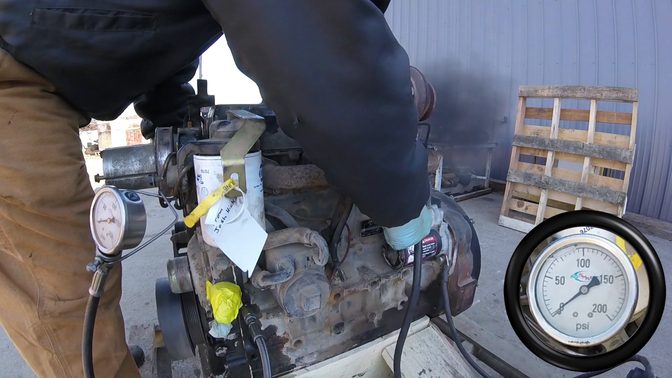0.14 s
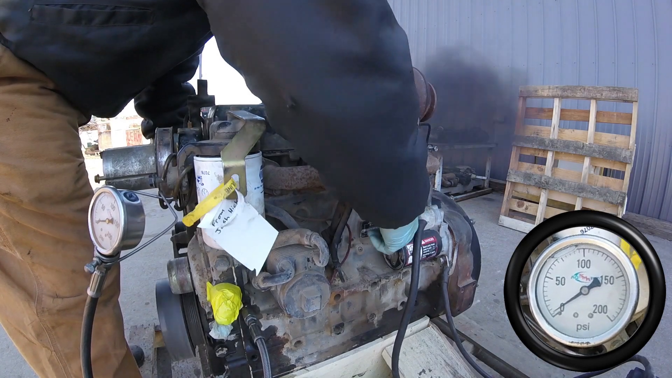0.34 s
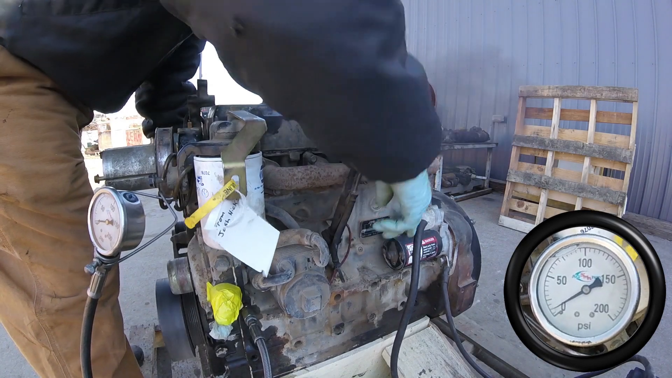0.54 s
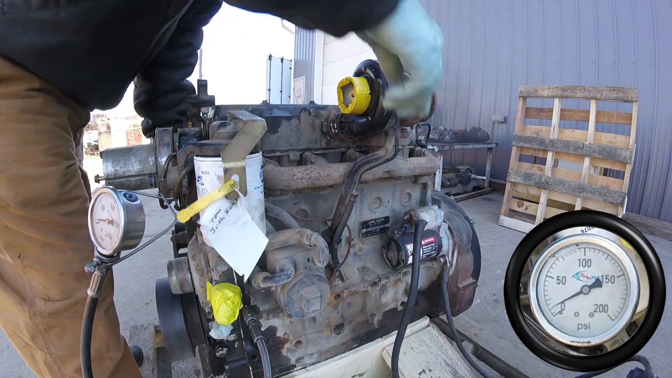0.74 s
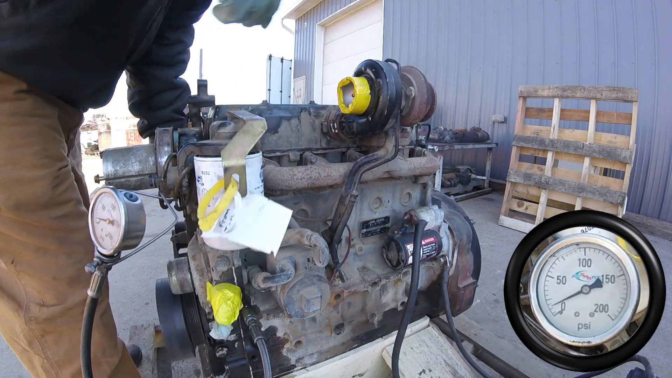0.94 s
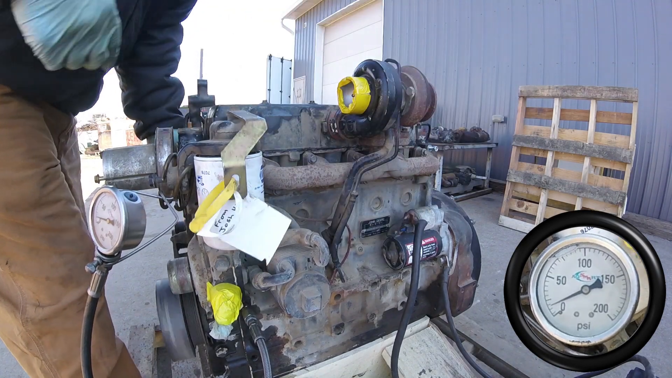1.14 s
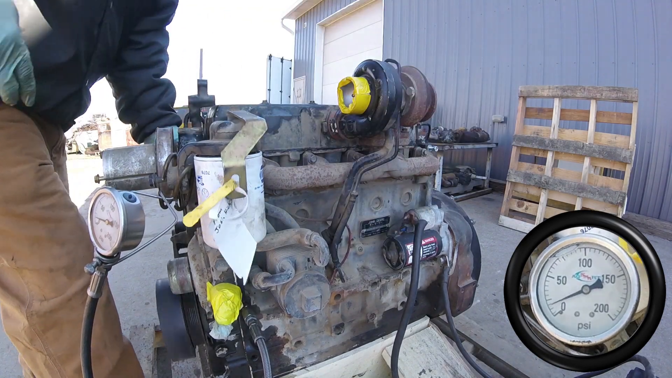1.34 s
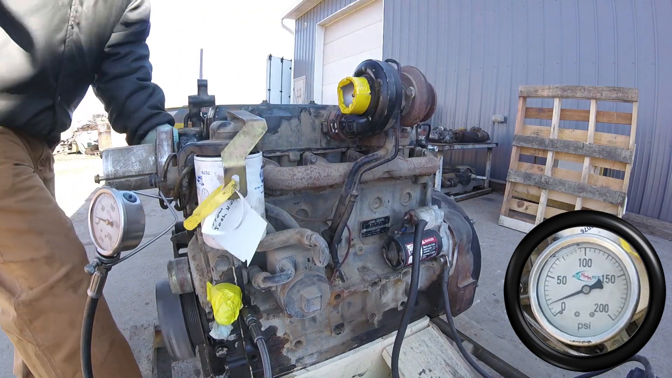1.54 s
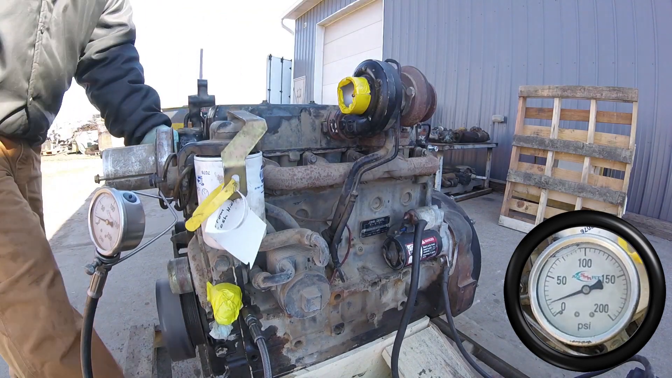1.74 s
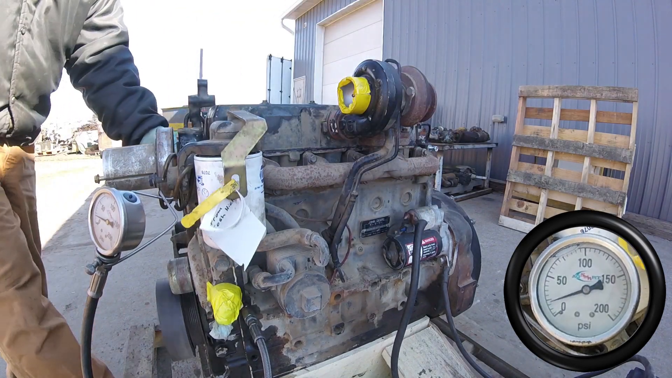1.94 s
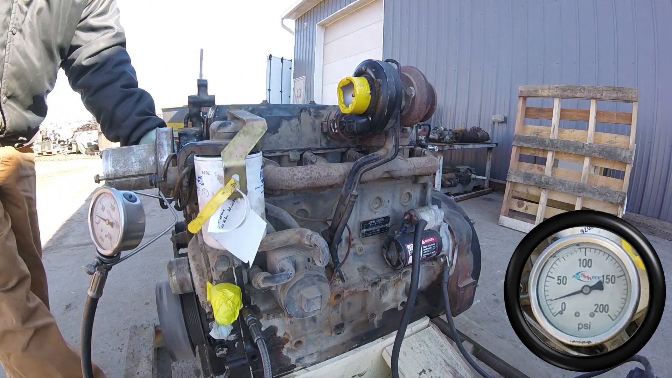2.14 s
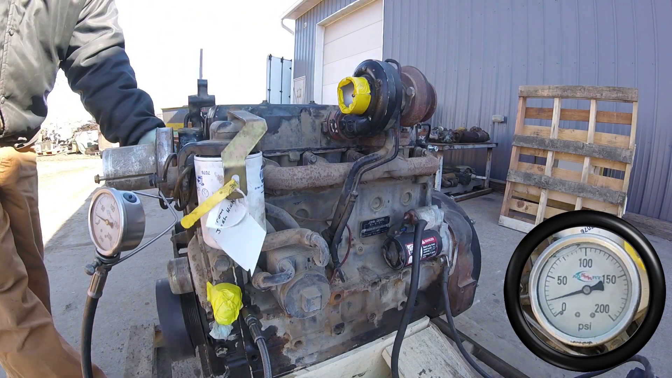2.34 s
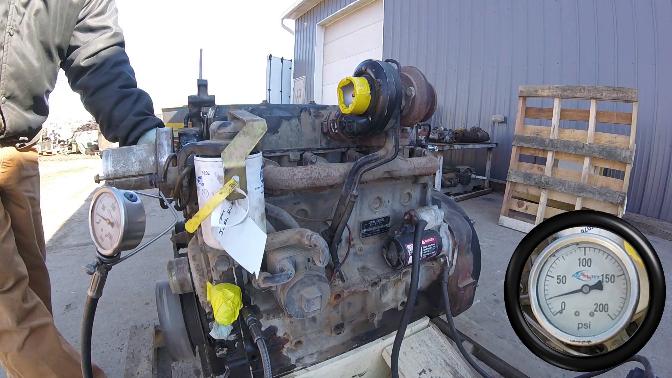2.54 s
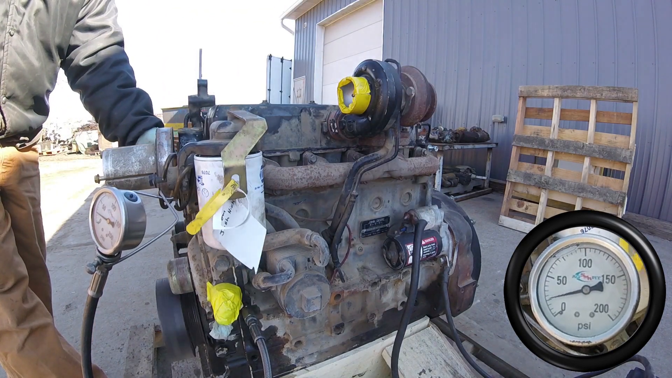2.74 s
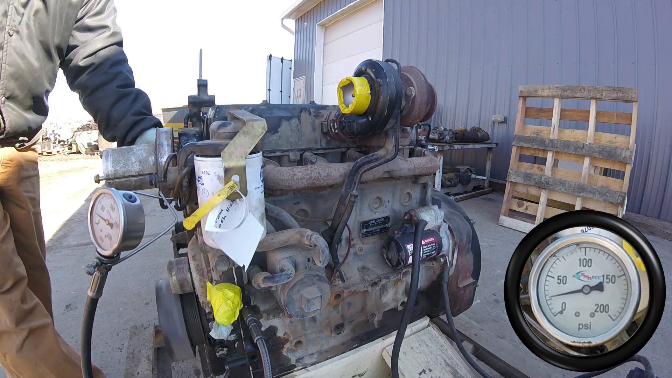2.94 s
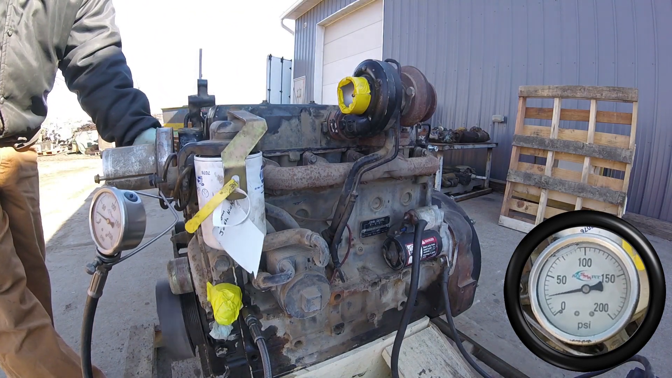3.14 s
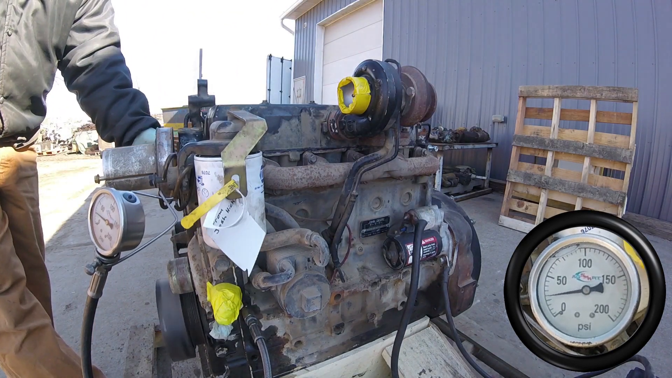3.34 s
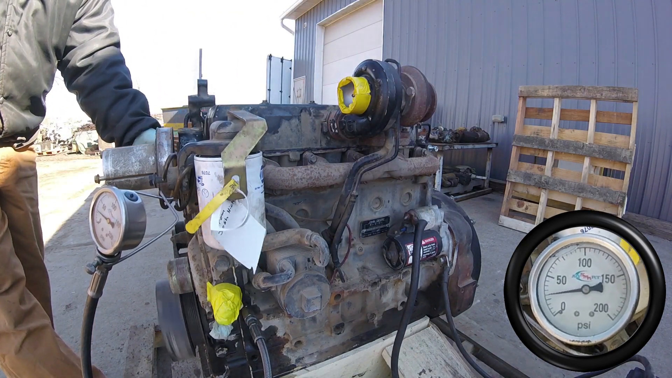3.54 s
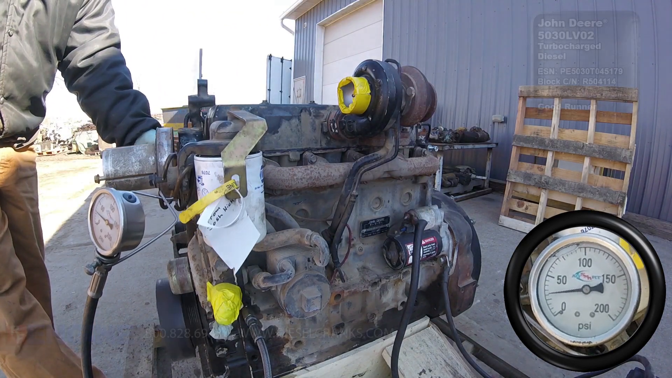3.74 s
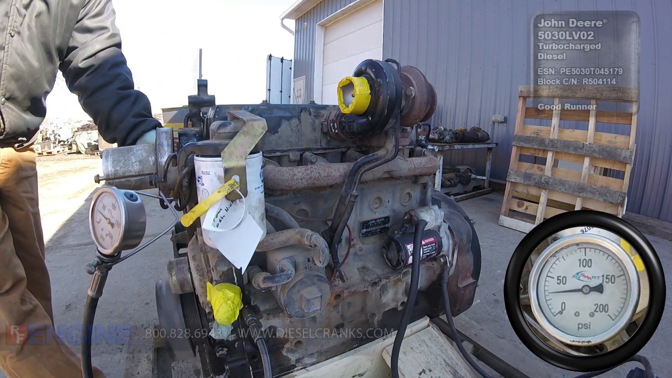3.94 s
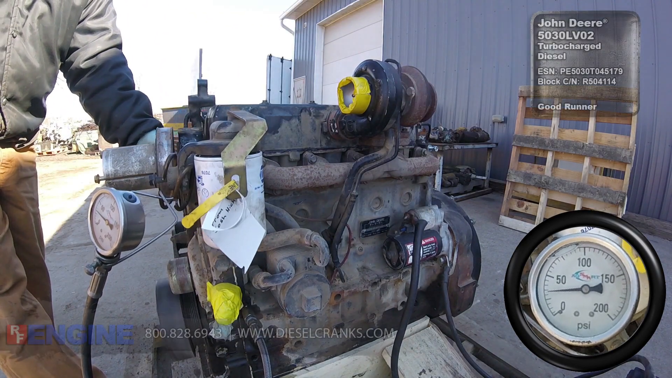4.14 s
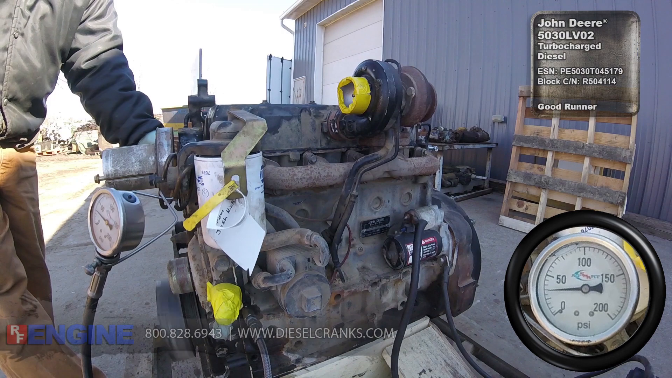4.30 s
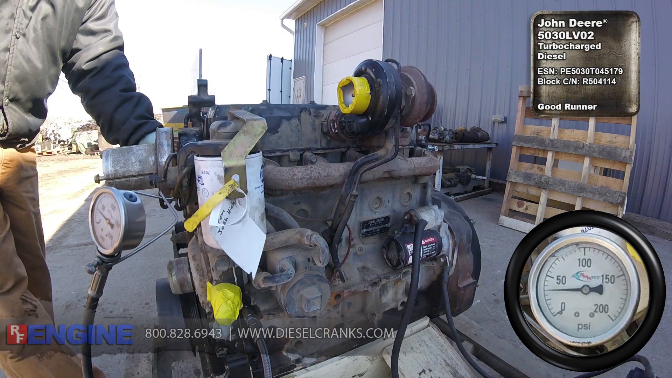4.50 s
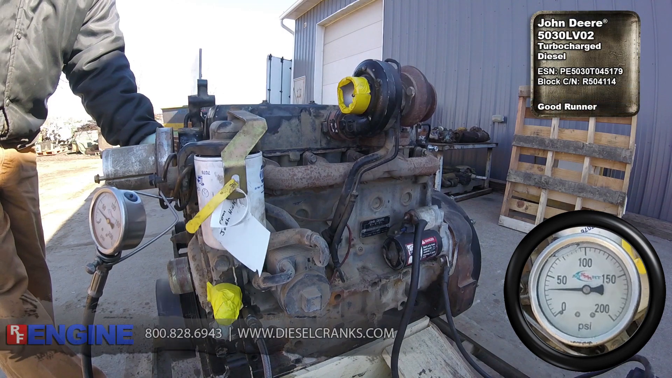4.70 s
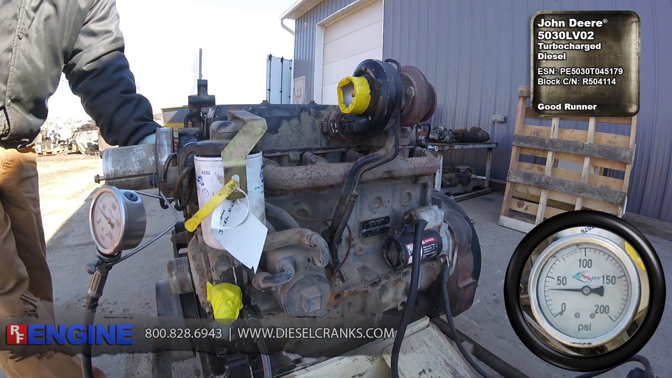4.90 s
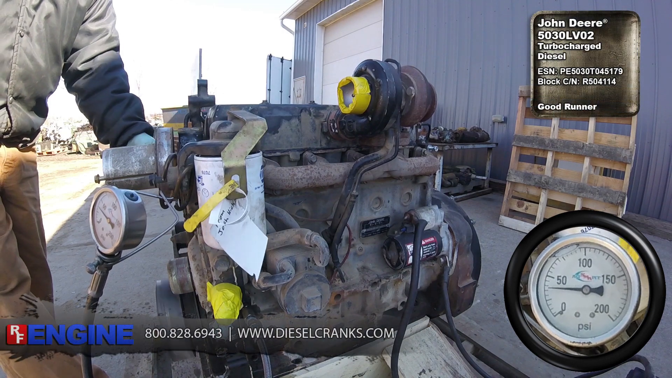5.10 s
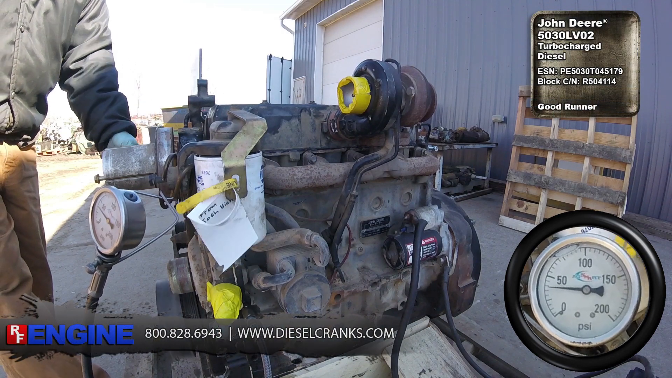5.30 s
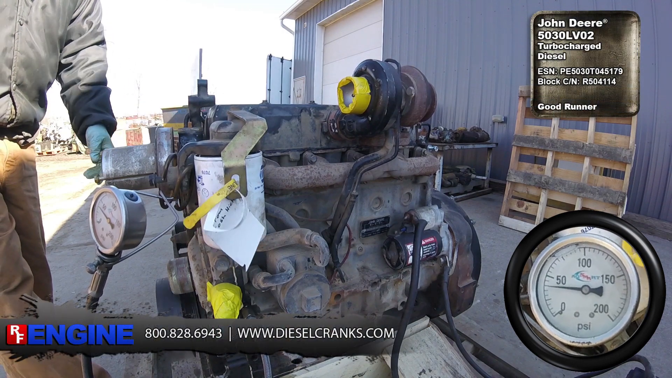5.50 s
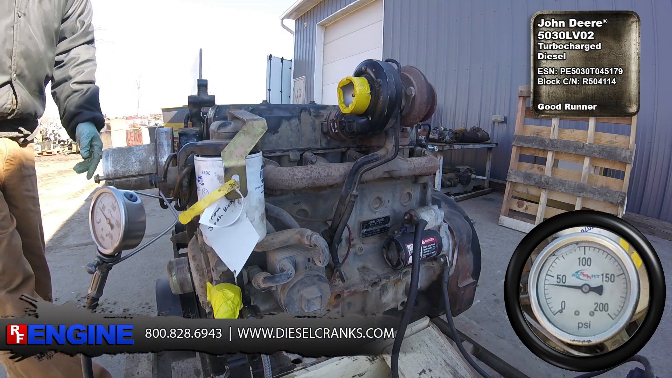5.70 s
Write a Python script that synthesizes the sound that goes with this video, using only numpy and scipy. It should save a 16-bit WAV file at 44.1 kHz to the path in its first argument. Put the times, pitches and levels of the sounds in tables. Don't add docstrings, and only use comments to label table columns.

```python
import sys
import numpy as np
from scipy import signal
from scipy.fft import rfft, irfft, next_fast_len
from scipy.io import wavfile
from scipy.ndimage import map_coordinates

SR = 44100
rng = np.random.default_rng(int(sys.argv[2]) if len(sys.argv) > 2 else 0)


def invert_db(level):
    return 10 ** (np.asarray(level, dtype=float) / 20)


def bounce(signal):
    frames = np.transpose(np.atleast_2d(signal))
    limited = np.clip(frames, -1, 1)
    pcm = np.round(limited * 32767).astype(np.int16)
    wavfile.write(sys.argv[1], SR, pcm)


N = 254016

IDLE_HZ, SHAKE_HZ, RACE_HZ = 43, 40, 51
SPOOL_S = 0.39


def unit(x):
    return x / np.sqrt(np.mean(x ** 2) + 1e-20)


def curves(rows):
    s, *columns = np.transpose(rows)
    return [np.interp(np.arange(N) / SR, s, column) for column in columns]


def filtered(x, response):
    m = next_fast_len(N + SR)
    return irfft(rfft(x, m) * response(np.fft.rfftfreq(m, 1 / SR)), m)[:N]


def coloured(points):
    f, db = np.transpose(points)
    return lambda hz: invert_db(np.interp(np.log(hz + 1), np.log(f + 1), db))


def resonant(modes):
    def response(f):
        total = 0
        for k, (centre, width, db) in enumerate(modes):
            damping = 1j * f * width
            total = total + (-1) ** k * invert_db(db) * damping / (centre * centre - f * f + damping)
        return total
    return response


def wobble(rate):
    knots = rng.standard_normal(int(N * rate / SR) + 4)
    return map_coordinates(knots, [np.arange(N) * rate / SR])


# t/s, rate (firings per s)
SPEED = [(0.0, 19.67), (0.06, 25.15), (0.1, 33.21), (0.3, 55.91), (0.51, 49.65), (0.82, 51.87),
         (1.1, 42.42), (1.25, 44.11), (1.45, 44.38), (1.7, 45.35), (2.02, 45.1), (2.6, 43.09),
         (3.54, 42.34), (4.0, 42.36), (4.3, 41.71), (4.6, 40.49), (4.81, 40.16), (5.76, 39.38)]


def speed():
    return curves(SPEED)[0]


def firings(lead):
    rate = speed()
    firing = np.cumsum(rate) / SR + lead
    return firing.astype(int), firing % 1 / rate


def towards(hz, lag_s=0):
    keep = np.exp(-1 / (lag_s * SR + 1e-9))
    moved = signal.lfilter([1 - keep], [1, -keep], speed() - IDLE_HZ)
    return np.clip(moved / (hz - IDLE_HZ), 0, 1)


# t/s, burn level/dB against idle, exhaust pressure level/dB
FUEL = [(0, -4, 4.5), (.1, -2.5, -0.5), (.2, 0, -6.5), (.3, 3.5, -9.5), (.34, -8.5, -11), (.4, -8, -12),
        (.5, -0.5, 1), (.68, 3.5, -1), (.8, 1, -1), (.88, -3, -2), (1.05, -3.5, -.5), (1.15, -0.8, 2),
        (1.3, 1.5, -1), (1.75, 0.5, -0.5), (3, 0, .5), (4.3, 0, 2), (5, -0.5, 0), (5.76, 0, 1)]


def fuel():
    return curves(FUEL)


# t/s, level/dB, high over low knock level/dB
CATCHES = [(0.0044, -16.5, -8), (0.042, -13, -8.5), (0.0825, -15.5, -9), (0.1106, -8.5, -5.5),
           (0.1365, -10.5, 0), (0.1619, -9, 2.5), (0.185, -12.5, 0), (0.2107, -18.5, 10), (0.231, -13.5, 7),
           (0.2495, -12.5, 0), (0.2717, -12.5, -4.5), (0.288, -16.5, -3), (0.308, -30, 18)]
# f/Hz, width/Hz, level/dB
COLD_LOW = [(1415, 61, -0.5), (1573, 54, 3), (2000, 150, -11)]
# f/Hz, width/Hz, level/dB
COLD_HIGH = [(2183, 150, 1.5), (2360, 15, 6), (2543, 57, 0.5), (3020, 287, -0.5), (3400, 183, 0.5),
             (4070, 110, -28)]
# f/Hz, level/dB per Hz
HISS = [(3000, -31), (4200, -3.5), (4460, -16), (4770, -11), (5560, -7), (6140, 1.5), (6570, -2.5),
        (7070, -14.5), (9100, -7.5), (9900, -11.5), (12000, -21.5), (15500, -18)]
# f/Hz, width/Hz, level/dB
COLD_CASING = [(204, 91, -4.5), (810, 48, -2.5), (1080, 75, -1.5)]


def catch():
    t = np.arange(SR // 20) / SR
    shape = (1 - np.exp(-t / 0.00027)) * (0.57 + np.exp(-t / 0.0017)) / (1 + (t / 0.014) ** 8)
    tilt = np.array([-0.33, 0.48, 0.12, -0.47])
    drive = np.zeros((4, N))
    for s, db, bright_db in CATCHES:
        start = round(s * SR)
        drive[:, start:start + len(t)] += invert_db(db + bright_db * tilt)[:, None] * shape
    colours = resonant(COLD_LOW), resonant(COLD_HIGH), coloured(HISS), resonant(COLD_CASING)
    out = np.zeros(N)
    for force, colour, trim_db in zip(drive, colours, (-4.5, -1.5, -16.5, -14.5)):
        grit = invert_db(2.1 * wobble(600)) * rng.standard_normal(N)
        out += invert_db(trim_db) * filtered(force * grit, colour) / np.std(filtered(grit, colour))
    return out


# f/Hz, level/dB per Hz
RUMBLE = [(15, -40), (40, -5), (55, -10), (85, 7), (105, -2), (122, -16), (205, -7.5), (300, -27),
          (420, -34.5)]


def rumble():
    cold_db, race_db, idle_db = -31, -42, -50
    hold_s, fall_s = 0.25, 0.072
    late = np.clip(np.arange(N) / SR - hold_s, 0, None)
    level = invert_db(cold_db) * np.exp(-late / fall_s) + invert_db(race_db) * towards(RACE_HZ) + invert_db(idle_db)
    return level * invert_db(2.7 * wobble(16)) * unit(filtered(rng.standard_normal(N), coloured(RUMBLE)))


ORDERS = [5, 10, 11, 15, 18, 20, 25, 30, 33, 45]
ORDER_DB = [-34.5, -35.5, -64, -47, -54.5, -54.5, -59.5, -51, -58, -52.5]
WEAK_ORDERS = [4.01, 8, 9, 21, 23, 29, 48]
WEAK_DB = [-43, -72, -60.5, -57, -49, -59.5, -58.5]
SHAKE_ORDERS = [11, 5, 13, 10, 15, 16, 18, 19, 20, 25, 29, 34, 35, 36, 40, 44, 45, 54, 55]
SHAKE_DB = [-58, -43, -63, -44.5, -45.5, -58, -62, -55, -40.5, -55, -60, -49.5, -43.5, -58, -49.5, -55, -53,
            -50, -47.5]
RACE_ORDERS = [3, 4.01, 8, 15, 16, 18, 19, 20, 23, 48]
RACE_DB = [-43, -48, -47.5, -53, -55, -49, -55, -52, -53, -54]


def exhaust():
    rate, race = speed(), towards(RACE_HZ)
    cycle = 2 * np.pi * (np.cumsum(rate) / SR + 3 / 8) / 5
    steady = invert_db(-2 * race)
    shaking = towards(SHAKE_HZ) ** 1.97 * (rate > 36)
    uneven = invert_db(3 * (2.7 - np.arange(N) / SR)) * (1 - race)
    groups = ((ORDERS, ORDER_DB, steady), (SHAKE_ORDERS, SHAKE_DB, shaking),
              (RACE_ORDERS, RACE_DB, race ** 2.4), (WEAK_ORDERS, WEAK_DB, uneven))
    size = {}
    for orders, levels_db, share in groups:
        for k, db in zip(orders, levels_db):
            size[k] = size.get(k, 0) + invert_db(db) * share
    lines = np.zeros(N)
    for k, strength in sorted(size.items()):
        sign = -1 if k % 5 and k < 33 else 1
        lines += sign * strength * invert_db(0.5 * wobble(4)) * np.cos(k * cycle + wobble(4) / 14)
    boom = resonant([(79.75, 3.43, 25.5)])
    return invert_db(fuel()[1]) * (lines - filtered(lines, boom))


def clatter_db():
    starter_off_s = 0.28
    starter = 1 / (1 + (np.arange(N) / SR / starter_off_s) ** 8)
    return -10 + 7.5 * starter + 2.5 * towards(RACE_HZ, SPOOL_S)


# ring level/dB, knock level/dB, hiss level/dB, thud level/dB
CYLINDERS = [(4, -6.5, 0, 0), (1.5, 2.5, 4, 0.5), (2, 0, 3.5, 1.5), (-2.5, -2, 3, -0.5),
             (-1.5, 3, 1.5, -6.5)]
IGNITION_LAG = [0.0002, 0, 0.0012, 0.0012, 0.0013]


def bursts(column, chance_db, lead, rise, decay, order, alike, gap_db, grit_db):
    index, since = firings(lead)
    cylinder = index % len(CYLINDERS)
    since = np.clip(since - np.array(IGNITION_LAG)[cylinder], 0, None)
    size = invert_db(np.array(CYLINDERS)[cylinder, column] + chance_db[index])
    flare = size * (1 - np.exp(-since / rise)) ** order * np.exp(-since / decay)
    habits = rng.standard_normal((len(CYLINDERS), SR // 10))
    habit = habits[cylinder, (since * SR).astype(int)]
    fresh = invert_db(grit_db * wobble(400)) * rng.standard_normal(N)
    mixed = alike * habit + np.sqrt(1 - alike ** 2) * fresh
    return flare * mixed + invert_db(clatter_db() + gap_db) * fresh


# f/Hz, width/Hz, level/dB
HEAD = [
    [(1408, 68, -3.5), (1640, 81, -2.5), (1900, 180, -7), (2400, 77, -9), (2990, 230, -9), (3960, 300, -31)],
    [(1620, 59, -6), (1850, 41, -19), (2117, 170, -13), (2637, 140, -13.5), (3187, 164, -14.5),
     (3393, 95, -13), (3940, 150, -29.5)],
    [(1098, 33, -16), (1412, 84, -8.5), (1596, 66, -1.5), (1840, 45, -2.5), (2346, 107, -9.5),
     (2933, 100, -14), (3440, 79, -13), (4100, 200, -35)],
    [(1065, 43, -21), (1445, 79, -8), (1608, 75, -11), (1847, 41, -9), (2160, 200, -14.5),
     (2700, 160, -14.5), (3280, 130, -14.5), (4100, 190, -29)],
    [(1432, 40, -9), (1894, 110, -19), (2135, 120, -13), (3300, 170, -20.5), (3920, 170, -35)],
]


def heads(burn, burn_db):
    blow = unit(bursts(1, 0.7 * burn, lead=0.2, rise=0.0005, decay=0.0045, order=1, alike=0.9,
                       gap_db=-14, grit_db=2))
    blow = invert_db(-34.5 + burn_db) * blow
    cylinder = firings(0.22)[0] % len(HEAD)
    struck = sum(filtered(blow * (cylinder == k), resonant(modes)) for k, modes in enumerate(HEAD))
    return invert_db(22.5) * struck


# f/Hz, width/Hz, level/dB
BLOCK = [(1416, 52, -9), (1579, 48, -4.5), (1869, 44, 1), (2185, 93, -9), (2363, 53, -6.5),
         (2680, 103, -11.5), (2905, 93, -16.5), (3177, 120, -15), (3620, 190, -20.5), (4000, 150, -22),
         (4220, 110, -23)]


def block(burn, burn_db):
    ring = bursts(0, 1.5 * burn, lead=0.15, rise=0.003, decay=0.0078, order=1, alike=0.82,
                  gap_db=2, grit_db=1.5)
    return invert_db(-30.5 + 0.74 * burn_db - 5.5) * unit(filtered(ring, resonant(BLOCK)))


def hiss(burn, burn_db):
    puff = bursts(2, 0.32 * burn, lead=0.42, rise=0.0072, decay=0.0042, order=3, alike=0.092,
                  gap_db=-18.5, grit_db=0.5)
    level_db = -40 + 0.58 * burn_db + 2.5 * towards(RACE_HZ, SPOOL_S)
    return invert_db(level_db) * unit(filtered(puff, coloured(HISS)))


# f/Hz, level/dB per Hz
CASING = [(150, -28), (250, -7.5), (400, -5), (480, -2), (600, -3), (700, -6), (820, -3.5), (930, -8.5),
          (1080, 1), (1220, -10), (1500, -48), (2500, -60)]


def thud(burn, burn_db):
    thump = bursts(3, 0.72 * burn, lead=0.2012, rise=0.0013, decay=0.0081, order=1, alike=0.99,
                   gap_db=-0.5, grit_db=2.5)
    return invert_db(-43 + 0.71 * burn_db) * unit(filtered(thump, coloured(CASING)))


def steep(hz):
    low, high = 1j * hz / 1150, 1j * hz / 4400
    return low ** 4 / (1 + 0.9 * low + low ** 2) ** 2 / (1 + 0.96 * high + high ** 2) ** 2


def knock():
    burn_db = fuel()[0]
    burn = rng.standard_normal(N * 60 // SR)
    metal = heads(burn, burn_db) + block(burn, burn_db)
    return filtered(metal, steep) + hiss(burn, burn_db) + thud(burn, burn_db)


# t/s, peak level/dB
TICKS = [
    (0.9717, -44),
    (0.9916, -42),
]


def ticks():
    t, force = np.arange(SR // 100) / SR, np.zeros(N)
    for s, db in TICKS:
        start = round(s * SR)
        force[start:start + len(t)] += invert_db(db + 11 - 60 * t / 0.012) * rng.standard_normal(len(t))
    return filtered(force, resonant([(11500, 900, 0), (13200, 900, 0)]))


def scene():
    return (exhaust() + knock() + catch() + rumble() + ticks())[None]


# f/Hz, level/dB
PORT = [(6600, 0), (6950, -1), (7600, 5), (7870, -0.5), (8130, 3.5), (8550, -2.5), (8970, 2), (10000, -7.5),
        (10400, 0), (11000, -9), (11500, 0.5), (12800, -7), (14200, -9), (15150, -20)]


def microphone(dry):
    heard = filtered(dry[0], coloured(PORT))[None]
    return heard / (1 + np.abs(heard / 0.86) ** 6) ** (1 / 6)


def low_pass(x):
    return signal.sosfilt(signal.butter(12, 15180, fs=SR, output="sos"), x)


def record(dry):
    heard = microphone(dry)
    return low_pass(heard)


dry = scene()
out = record(dry)
bounce(out)
```